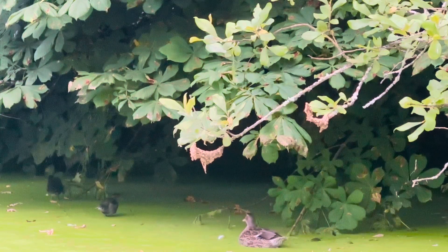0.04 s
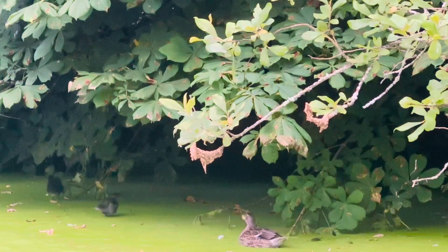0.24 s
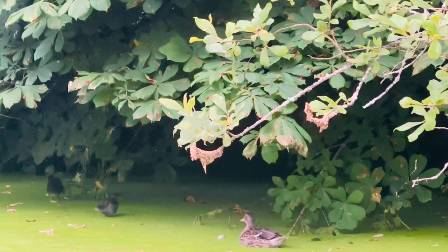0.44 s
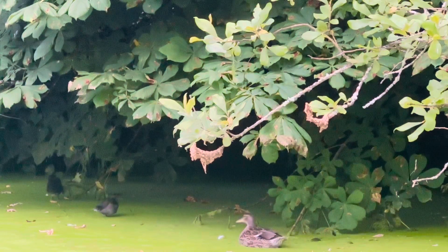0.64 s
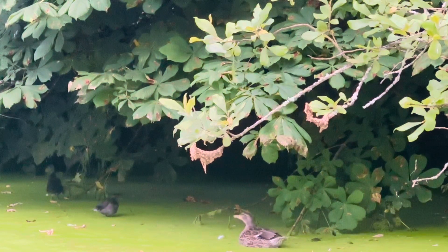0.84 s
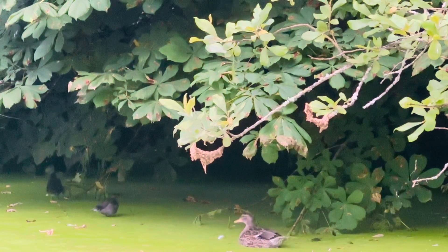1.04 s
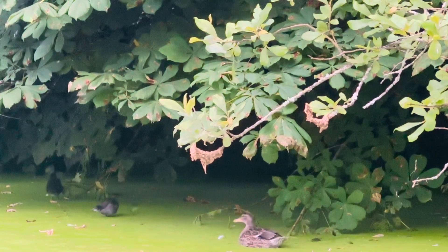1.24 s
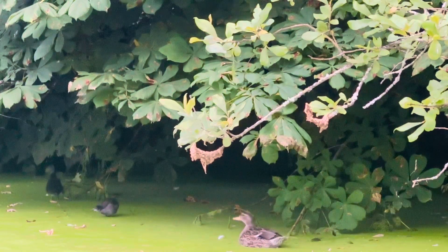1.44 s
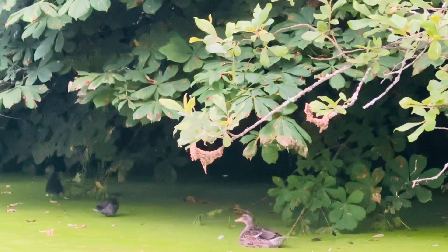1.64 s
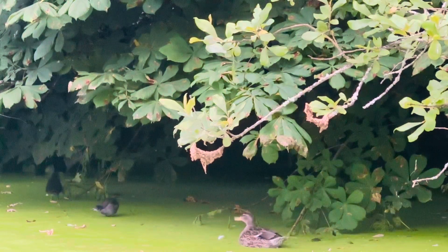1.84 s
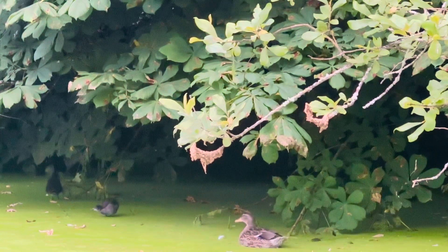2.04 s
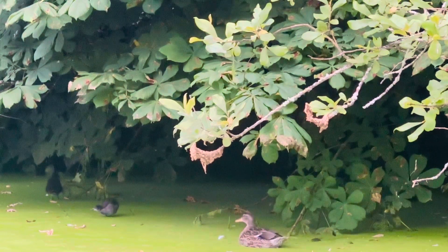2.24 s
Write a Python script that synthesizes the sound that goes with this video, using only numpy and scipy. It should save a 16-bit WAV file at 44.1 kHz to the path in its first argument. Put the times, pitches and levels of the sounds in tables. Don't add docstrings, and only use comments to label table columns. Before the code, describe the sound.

A duck utters two very short falling peeps with a creaky, raspy edge, about a second apart, echoing lightly from banks and trees, over faint low traffic rumble, leaf hiss, ticks and tiny drips; stereo microphone nearby.

```python
import sys
import numpy as np
from scipy import signal
from scipy.fft import rfft, irfft, next_fast_len
from scipy.io import wavfile

SR = 44100
rng = np.random.default_rng(int(sys.argv[2]) if len(sys.argv) > 2 else 0)


def master(y):
    cut = np.clip(np.atleast_2d(y).T, -1, 1)
    pcm = np.round(cut * 32767)
    wavfile.write(sys.argv[1], SR, pcm.astype(np.int16))


def rack_gain(trim_db):
    fader = np.asarray(trim_db, float)
    return 10 ** (fader / 20)


N = 101429


def rms_one(x):
    return x / np.sqrt(np.mean(x ** 2) + 1e-20)


def at_hz(points, hz):
    table_hz, values = np.array(points).T
    return np.interp(np.log(hz), np.log(table_hz), values)


def over_time(table):
    s, *columns = np.transpose(table)
    return [np.interp(np.arange(N) / SR, s, column) for column in columns]


def drift(rate_hz):
    r = np.exp(-2 * np.pi * rate_hz / SR)
    wander = signal.lfilter([1], [1, -2 * r, r * r], rng.standard_normal(N + SR))
    return rms_one(wander[SR:])


def band(x, low_hz, high_hz):
    limits = [max(low_hz, 10), min(high_hz, .45 * SR)]
    return signal.sosfilt(signal.butter(2, limits, "band", fs=SR, output="sos"), x)


def narrow_noise(noise, hz, width_hz):
    edges = hz - width_hz / 2, hz + width_hz / 2
    return rms_one(band(band(noise, *edges), *edges))


def add(out, s, sound):
    i = int(s * SR)
    out[i:i + len(sound)] += sound[:max(len(out) - i, 0)]


def puffs(rows, tail_db, t60, edge):
    out, t = np.zeros(N), np.arange(SR // 2) / SR
    for (s, hold, hz, width_hz, db), noise in zip(rows, rng.standard_normal((len(rows), len(t)))):
        held = np.clip((hold - t) / edge, 0, 1)
        tail = rack_gain(tail_db - 60 * (t - hold) / t60)
        shape = np.minimum(t / edge, 1) * (held + (1 - held) * tail)
        add(out, s, rack_gain(db) * narrow_noise(noise, hz, width_hz) * shape)
    return out


# (pitch [Hz], likeness [0 to 1])
LIKENESS = [(30, .98), (60, .96), (110, .93), (200, .8), (380, .66), (700, .3), (1290, .74), (2380, .98),
            (6000, .998)]


def banded_noise(spectrum, patchy_db, shared_db):
    out, together, white = 0, drift(2.35), rng.standard_normal((2, 2, N))
    edges = np.geomspace(spectrum[0][0], spectrum[-1][0], 12)
    for k, (low, high) in enumerate(zip(edges, edges[1:])):
        mid, side = band(white[k % 2], low, high)
        hz = np.sqrt(low * high)
        alike = np.clip(at_hz(LIKENESS, hz), -1, 1)
        gain = rack_gain(at_hz(spectrum, hz) + shared_db * together + patchy_db * drift(10.4))
        out = out + gain * (np.sqrt(1 + alike) * mid + np.sqrt(1 - alike) * side * [[1], [-1]])
    return rms_one(out)


# (pitch [Hz], level [dB per Hz])
TRAFFIC_TONE = [(13, -65), (22, -29), (53, -2.5), (81, 4), (146, -7.5), (184, -4), (257, -16), (360, -12.5),
                (1200, -38), (1560, -81), (2640, -120)]
# (time [s], level [dB])
TRAFFIC_SWELL = [
    (0, 1.7),
    (.3, 2.7),
    (.6, 1.5),
    (.85, 1),
    (1.1, -1.5),
    (1.3, 0),
    (1.5, -1.2),
    (1.75, -0.4),
    (1.9, -2),
    (2.3, -0.5),
]


def rumble():
    level_db, pan_db = -56, .5
    traffic = rack_gain(level_db) * banded_noise(TRAFFIC_TONE, patchy_db=-0.2, shared_db=1.47)
    swell_db, = over_time(TRAFFIC_SWELL)
    return traffic * rack_gain(pan_db * np.array([[1], [-1]])) * rack_gain(swell_db)


# (pitch [Hz], level [dB per Hz])
LEAF_TONE = [(700, -1), (1500, -1.5), (3000, -9.5), (5000, -9.5), (7500, -8.5), (10000, -15),
             (12500, -22.5), (15200, -13)]
# (time [s], level [dB], brightness [dB])
GUSTS = [(0, -79.5, -6), (.2, -83.5, 0), (.45, -81, -1), (.62, -78.5, -1.5), (.72, -82, -8.5),
         (.9, -82, 0.5), (1.18, -82.5, -3.5), (1.3, -79.5, 1.5), (1.5, -76.5, 5), (1.6, -81, -5),
         (1.7, -81.5, 2.5), (1.85, -81.5, 0), (1.95, -84, -6.5), (2.3, -80.5, -10)]


def leaves():
    level_trim_db, crackles_per_s, low_crackle_db, high_crackle_db = 6.5, 220, -8, -16
    gust_db, bright_db = over_time(GUSTS)
    when = rng.random(N) < crackles_per_s / SR
    strength = rack_gain(3.8 * np.minimum(rng.exponential(1, N), 3))
    crackle = when * strength * rng.choice([-1, 1], N)
    other_crackle = np.roll(crackle, N // 2)
    hiss = banded_noise(LEAF_TONE, patchy_db=1.8, shared_db=1.1)
    hiss = hiss + rack_gain(low_crackle_db) * rms_one(band(crackle, 1600, 4300))
    hiss = hiss + rack_gain(high_crackle_db) * rms_one(band(other_crackle, 5700, 16000))
    top = band(hiss, 3930, 8600)
    return rack_gain(gust_db + level_trim_db) * (hiss + (rack_gain(bright_db) - 1) * top)


# (time [s], peak level [dB], centre [Hz])
TICKS = [(.133, -79, 5000), (.166, -76, 13500), (.2084, -64, 9800), (.292, -68, 13800), (0.354, -55, 6140),
         (0.379, -58.5, 11500), (.465, -67, 3960), (.5666, -65, 9300), (.5771, -60, 3560),
         (0.578, -62, 10400), (.627, -67, 5200), (0.6385, -61.5, 12400), (.655, -59.5, 11700),
         (0.772, -67, 3500), (0.815, -55.5, 5400), (0.8724, -54.5, 8450), (.9747, -67, 10800),
         (1.015, -63, 2540), (1.0919, -68, 3070), (1.19, -68, 1980), (1.277, -62, 3000),
         (1.277, -59.5, 9500), (1.49, -60, 2820), (1.5586, -52, 3000), (1.5623, -62, 11000),
         (1.6243, -53.5, 2900), (1.635, -54, 4470), (1.6766, -55.5, 5630), (1.745, -55, 2870),
         (1.748, -54, 3970), (1.8287, -64, 9500), (1.985, -61, 3150), (1.9962, -62, 9800),
         (2.0753, -68, 9560), (2.121, -52, 9350), (2.1201, -64, 13500), (2.1894, -70, 11600),
         (2.2563, -72, 10500)]


def ticks():
    t60_s, width, trim_db = 0.03, 0.4, -8.5
    out, t = np.zeros(N), np.arange(SR // 10) / SR
    for (s, db, hz), noise in zip(TICKS, rng.standard_normal((len(TICKS), len(t)))):
        burst = narrow_noise(noise, hz, width * hz)
        add(out, s - .001, rack_gain(db + trim_db - 60 * t / t60_s) * burst)
    return out


# (start [s], hold [s], centre [Hz], width [Hz], level [dB])
CATCHES = [
    (.217, .012, 1650, 500, -49),
    (1.3485, .005, 1550, 600, -43),
    (1.338, .018, 570, 400, -59),
    (1.349, .006, 3500, 3000, -60),
    (.205, .02, 450, 300, -60),
]


def catches():
    return puffs(CATCHES, tail_db=-7.5, t60=0.28, edge=0.001)


# (end [s], length [s], level [dB])
CREAKS = [
    (.2165, .005, -41),
    (1.3482, .0155, -35),
]


def creaks():
    from_hz, to_hz, ring_hz, ring_s, swell_db = 240, 300, 800, .006, 14
    out, t = np.zeros(N), np.arange(0, .02, 1 / SR)
    for end, length, db in CREAKS:
        s = 0.
        while s < length:
            share = s / length
            fade = rack_gain(-60 * t / ring_s) * (1 - np.exp(-t / 0.0001))
            ring = np.sin(2 * np.pi * ring_hz * (0.36 + share) * t) * fade
            add(out, end - length + s, rack_gain(db - swell_db * (1 - share)) * ring)
            s += 1 / (from_hz + (to_hz - from_hz) * share)
    return out


# (time [s], pitch [Hz], fundamental [dB], second partial [dB], third partial [dB])
PEEPS = [
    [(.217, 1250, -58, -75, -80), (.2195, 1240, -37, -47, -67), (.226, 1180, -29, -41, -62),
     (.233, 1078, -33, -38, -50), (.239, 1022, -32, -35, -46), (.244, 985, -38, -39, -44),
     (.249, 970, -47, -40, -45), (.254, 965, -47, -46, -57), (.26, 960, -58, -64, -62)],
    [(1.349, 1330, -60, -80, -88), (1.3515, 1350, -31, -57, -76), (1.357, 1215, -34, -58, -63),
     (1.36, 1115, -35, -40, -57), (1.365, 1055, -32, -41, -53), (1.371, 990, -38, -35, -44),
     (1.377, 958, -40, -38, -44), (1.381, 938, -41, -39, -50), (1.387, 925, -57, -64, -64)],
]
# (multiple of the pitch, level [dB])
OVERTONES = [(4, -22), (5, -22), (6, -32), (7, -34), (8, -30), (9, -38), (10, -42)]
# (time [s], multiple, half width [s])
CANCELS = [
    (.2305, 1, .003),
    (.223, 2, .001),
    (.2445, 2, .0015),
    (.2422, 3, .0012),
    (.227, 3, .002),
    (1.3545, 1, .003),
    (1.3695, 1, .003),
    (1.354, 2, .004),
    (1.374, 2, .0015),
    (1.3748, 3, .0015),
]


def voice():
    jitter, jitter_hz, flutter_db, flutter_hz = .011, 300, 4.5, 200
    cancel_rest = .15
    bill_hz, bill_width_hz, bill_off_db = 4800, 750, -17
    out, wobble = np.zeros(N), drift(jitter_hz)
    flutter = [drift(flutter_hz) for _ in OVERTONES]
    for rows in PEEPS:
        s, *columns = np.transpose(rows)
        t = np.arange(s[0], s[-1], 1 / SR)
        start = int(s[0] * SR)
        here = slice(start, start + len(t))
        hz, *levels_db = [np.interp(t, s, c) for c in columns]
        phase = 2 * np.pi * np.cumsum(hz * (1 + jitter * wobble[here])) / SR
        partials = [rack_gain(db) * np.exp(1j * (k + 1) * phase) for k, db in enumerate(levels_db)]
        for when, k, half in CANCELS:
            u = (t - when) / half
            partials[k - 1] = partials[k - 1] * (u + 1j * cancel_rest) / np.sqrt(1 + u ** 2)
        tone = sum(partials).real
        effort_db = (levels_db[0] + levels_db[1]) / 2
        steady_phase = 2 * np.pi * np.cumsum(hz) / SR
        for (k, db), f in zip(OVERTONES, flutter):
            off_bill = 1 - np.exp(-((k * hz - bill_hz) / bill_width_hz) ** 2)
            bill_db = bill_off_db * off_bill * (k <= 6)
            level_db = effort_db + db + bill_db + flutter_db * f[here]
            tone += rack_gain(level_db) * np.sin(k * steady_phase)
        add(out, s[0], -np.sqrt(2) * tone * signal.windows.tukey(len(t), .05))
    return out


# (start [s], hold [s], centre [Hz], width [Hz], level [dB])
WHEEZES = [(.222, .045, 8400, 1000, -57), (.229, .035, 4950, 1100, -61), (.219, .035, 4000, 1600, -64),
           (.219, .04, 8400, 2800, -63), (.222, .045, 15400, 400, -73), (.225, .03, 12800, 1200, -78),
           (1.349, .04, 12000, 6000, -73), (1.358, .03, 13100, 1200, -73), (1.357, .03, 4700, 2200, -62),
           (1.355, .03, 8300, 2200, -67), (1.359, .01, 10600, 900, -69), (1.352, .04, 15500, 400, -77)]


def wheezes():
    return puffs(WHEEZES, tail_db=-6, t60=.5, edge=0.00093)


# (delay [s], level [dB])
BANKS = [
    (.045, -21),
    (.073, -16),
    (.11, -28),
    (.148, -26),
]


def trees(x):
    level_db, t60_s, rise_s, echoes_per_s, wide = -35, .55, .01, 5000, .5
    t = np.arange(SR // 2) / SR
    chosen = rng.random((2, len(t))) < echoes_per_s / SR
    scatter = rng.standard_normal((2, len(t))) * chosen
    mid, side = scatter * rack_gain(level_db - 60 * t / t60_s) * (1 - np.exp(-t / rise_s))
    both_sides = mid + wide * side * [[1], [-1]]
    leaf_echo = signal.fftconvolve(band(x, 1300, 3520)[None], both_sides, axes=1)[:, :N]
    bank_echo, dull = np.zeros(N), band(x, 100, 2480)
    for s, db in BANKS:
        add(bank_echo, s, rack_gain(db) * dull[:N - int(s * SR)])
    return leaf_echo + bank_echo


# (start [s], hold [s], centre [Hz], width [Hz], level [dB])
RUSTLES = [(.82, .02, 5700, 1800, -77), (1.235, .1, 6500, 2500, -79), (.57, .03, 9000, 6000, -77),
           (.87, .06, 9000, 2500, -78), (.44, .03, 4000, 700, -78), (1.615, .02, 1200, 500, -68),
           (.29, .012, 1550, 400, -64), (1.275, .05, 4450, 350, -77), (1.2, .025, 4150, 200, -80),
           (1.445, .015, 4500, 200, -72), (1.84, .11, 7500, 350, -84), (1.98, .03, 3200, 2000, -76),
           (1.93, .05, 14500, 1200, -89), (2.0, .06, 10500, 4000, -79), (2.07, .2, 9500, 2500, -84),
           (1.55, .04, 10500, 2500, -81)]


def rustles():
    return puffs(RUSTLES, tail_db=-2, t60=0.094, edge=0.0027)


# (time [s], peak level [dB], pitch [Hz])
DROPS = [(0.537, -58, 1380), (0.549, -60.5, 1620), (0.795, -65, 690), (1.56, -65, 1980), (1.629, -60, 1960),
         (1.744, -52.5, 2740), (1.789, -69, 1190), (1.907, -59.5, 1250), (1.963, -64.5, 1410),
         (1.981, -66, 1280), (2.05, -63, 1900), (2.092, -66.5, 883), (2.149, -60, 1300), (2.19, -62, 1910),
         (2.273, -63, 1243)]


def drops():
    cycles, trim_db = 38, 3.5
    out, t = np.zeros(N), np.arange(0, .08, 1 / SR)
    for s, db, hz in DROPS:
        main = np.sin(2 * np.pi * hz * t)
        above = np.sin(2 * np.pi * 1.7 * hz * t)
        below = np.sin(2 * np.pi * 0.72 * hz * t)
        tones = main + rack_gain(-8) * (above + below)
        fade = rack_gain(db + trim_db - 60 * t * hz / cycles) * (1 - np.exp(-t / 0.00046))
        add(out, s - .002, fade * tones)
    return out


def scene():
    background = rumble() + leaves()
    bird = creaks() + voice()
    rasp = catches() + wheezes()
    small = ticks() + rustles() + drops()
    return background + bird + trees(bird) + rasp + small


def top_cut(x):
    return signal.sosfilt(signal.butter(12, 15680, fs=SR, output="sos"), x)


# (pitch [Hz], phase difference [rad])
PORT_PHASE = [(0, 0), (1000, .2), (2000, .15), (3300, .45), (5800, 0), (6700, .3), (7900, 3.0), (8750, 3.0),
              (9500, 1.3), (10600, .2), (12600, 0), (14200, -1.1), (15300, -2.4)]


def record(dry):
    size = next_fast_len(N + 4096)
    hz, turn = np.transpose(PORT_PHASE)
    half = np.exp(.5j * np.interp(np.arange(size // 2 + 1) * SR / size, hz, turn))
    ported = irfft(rfft(dry, size) * [half, half.conj()], size)[:, :N]
    return top_cut(ported)


dry = scene()
out = record(dry)
master(out)
```